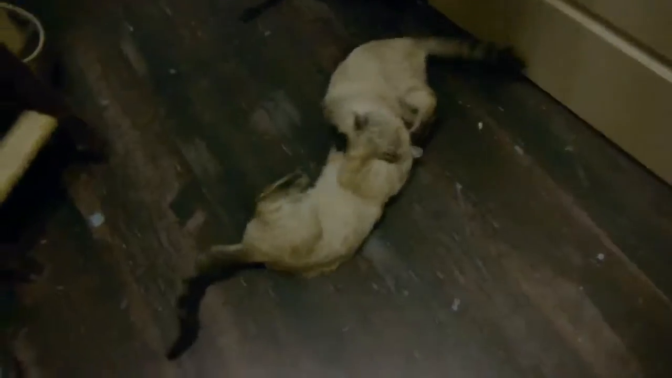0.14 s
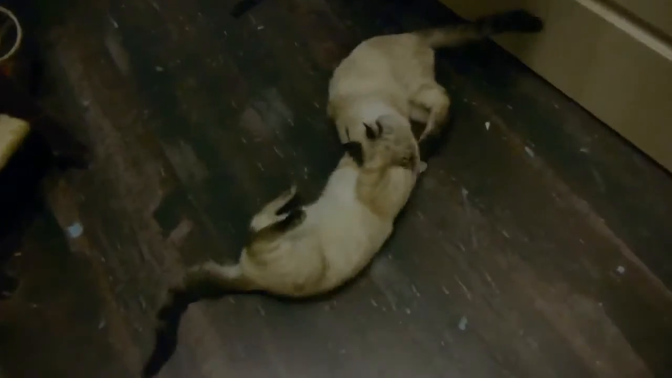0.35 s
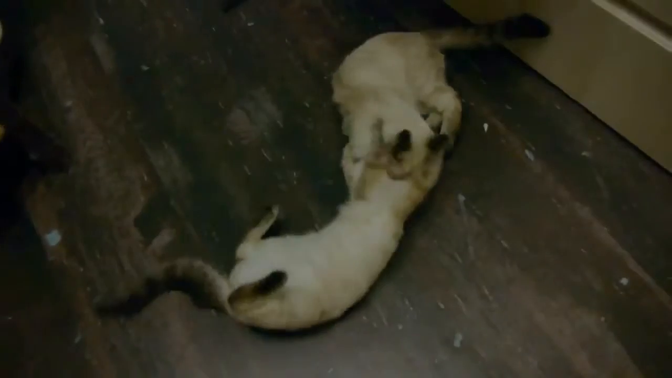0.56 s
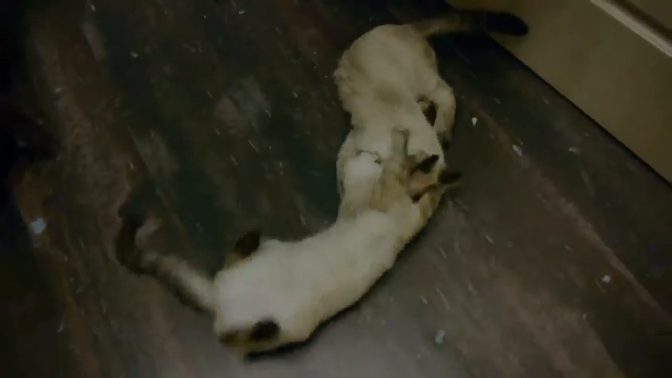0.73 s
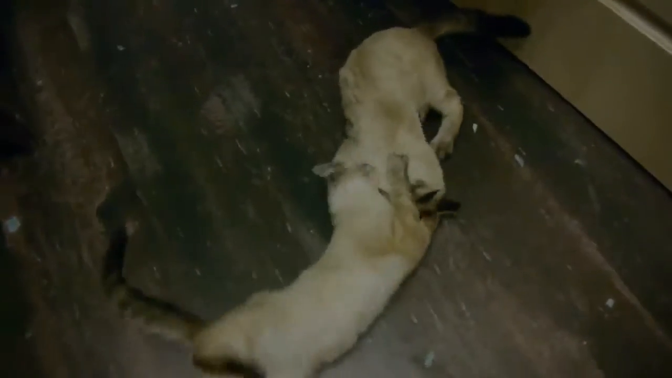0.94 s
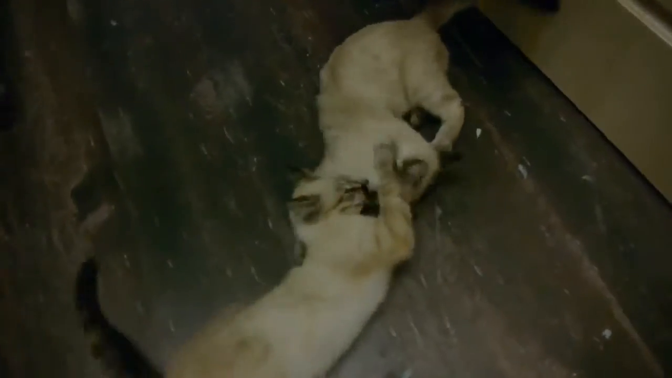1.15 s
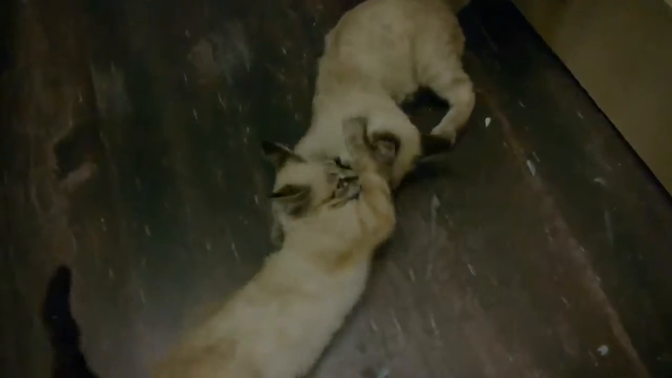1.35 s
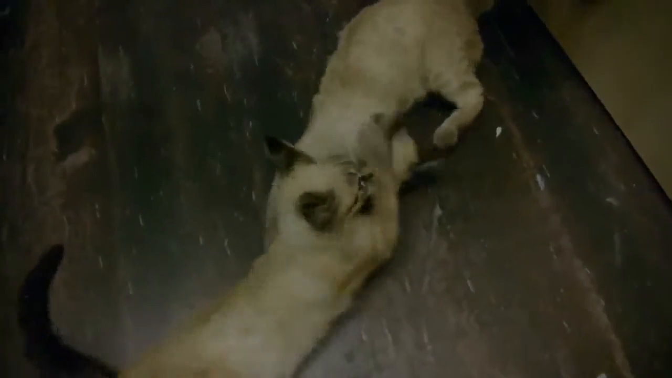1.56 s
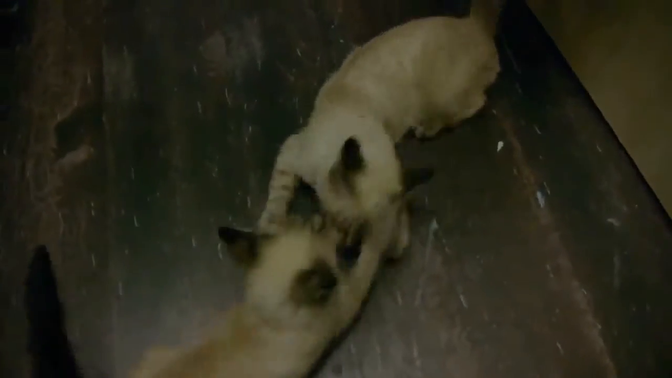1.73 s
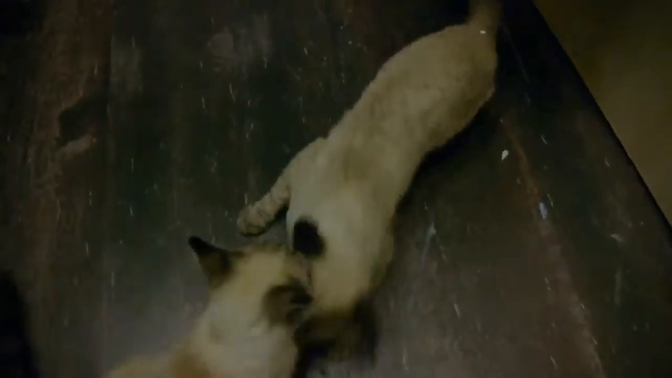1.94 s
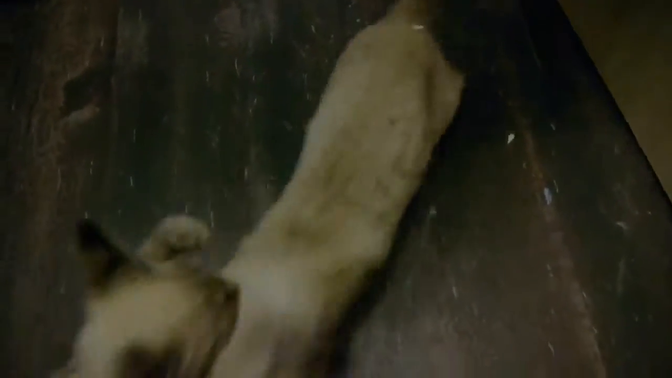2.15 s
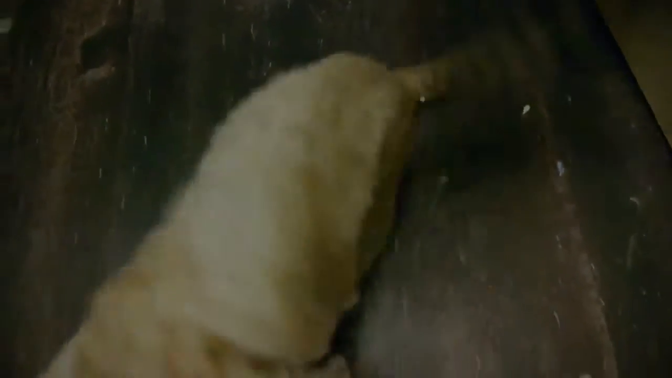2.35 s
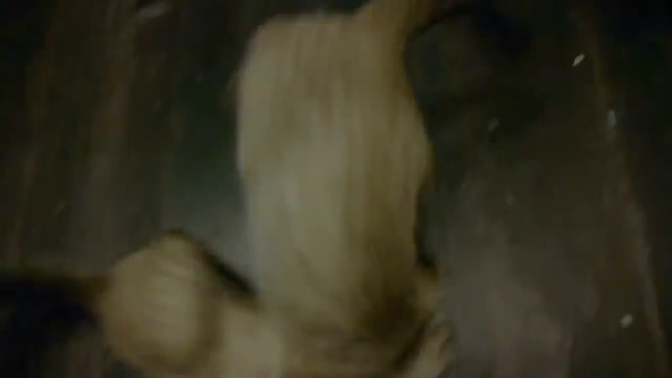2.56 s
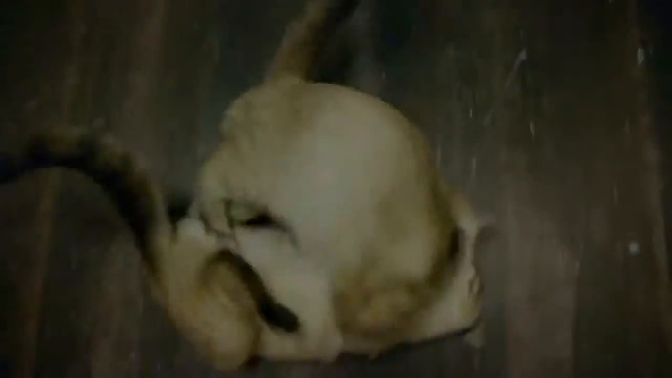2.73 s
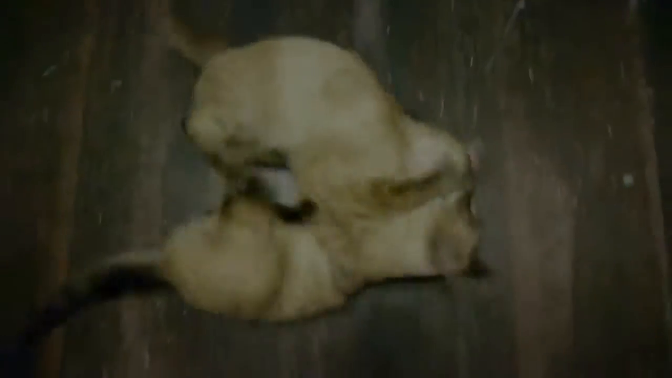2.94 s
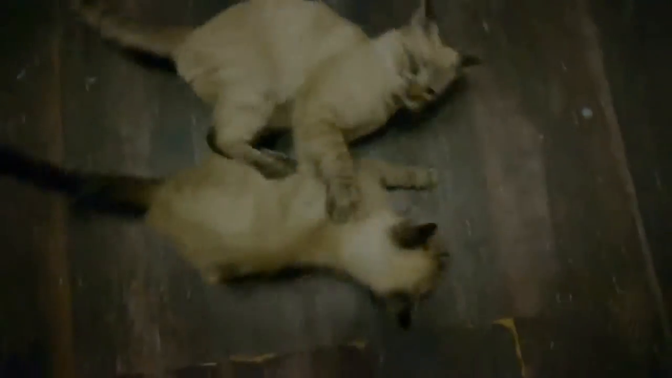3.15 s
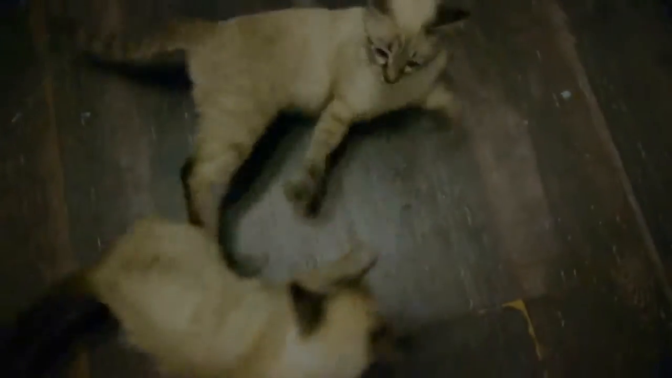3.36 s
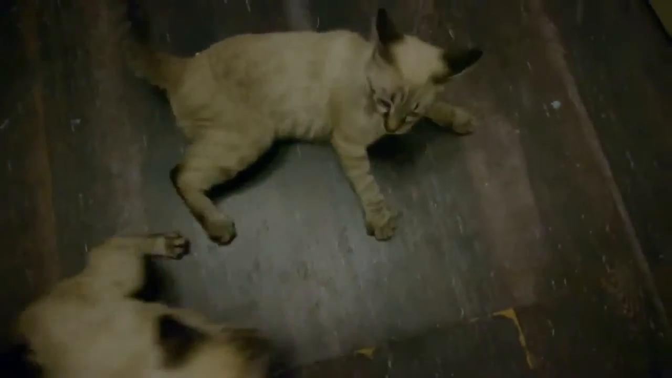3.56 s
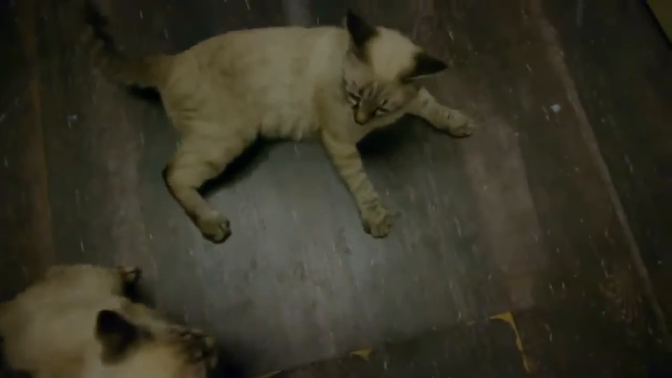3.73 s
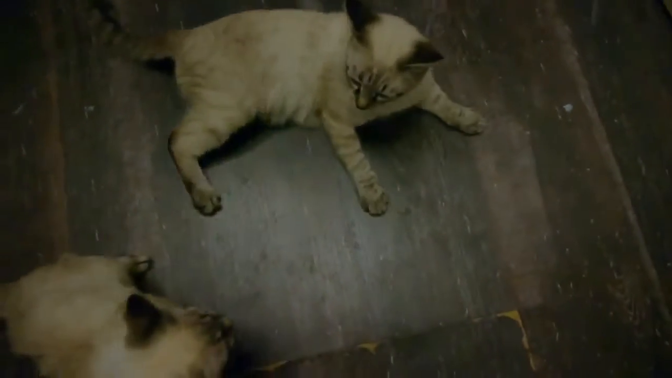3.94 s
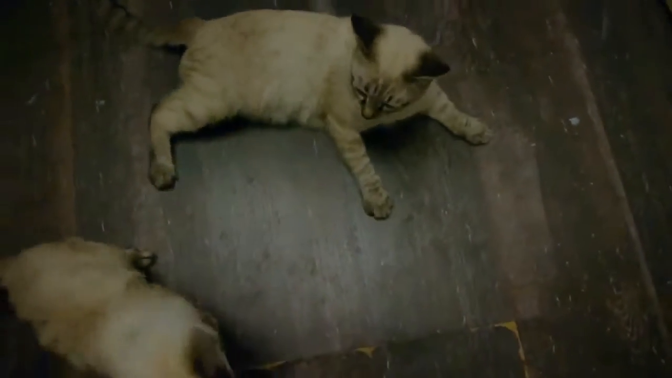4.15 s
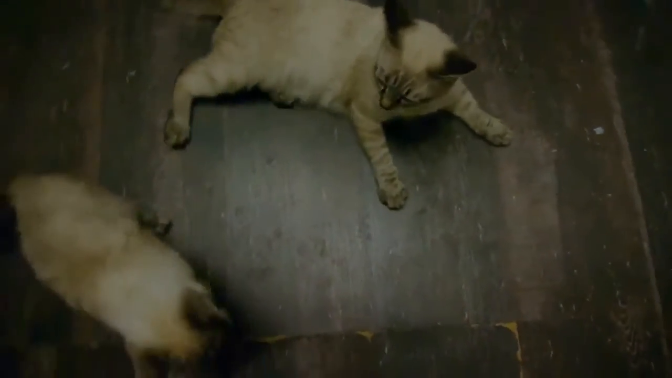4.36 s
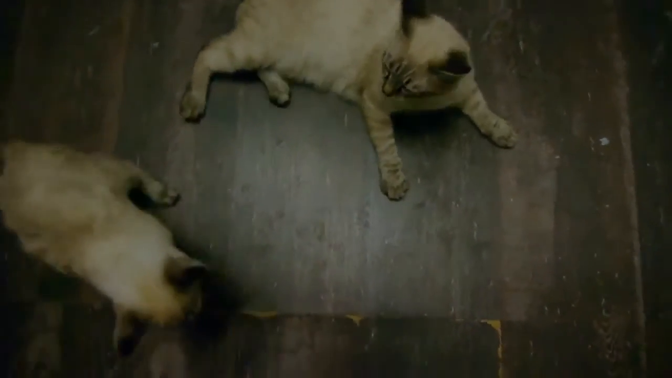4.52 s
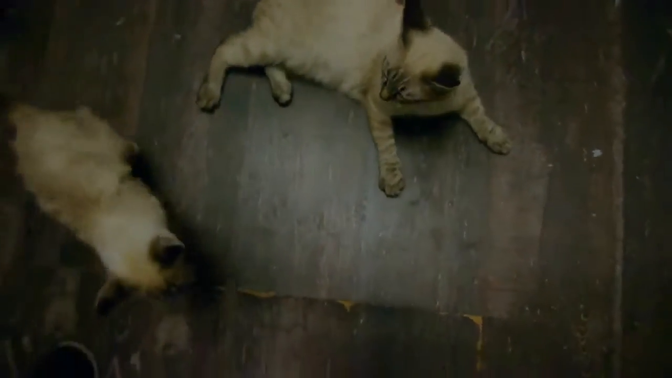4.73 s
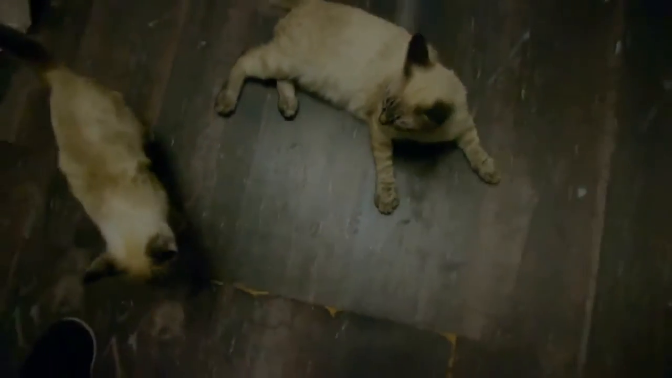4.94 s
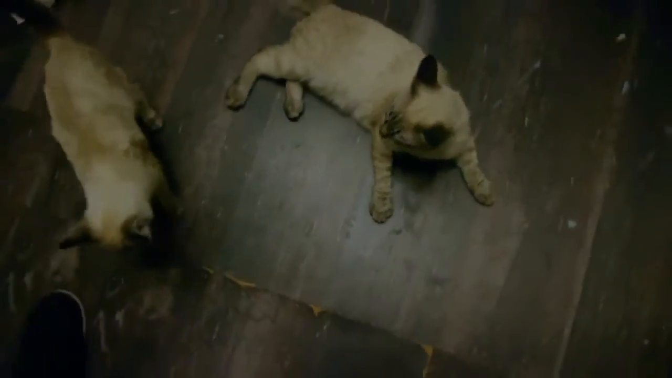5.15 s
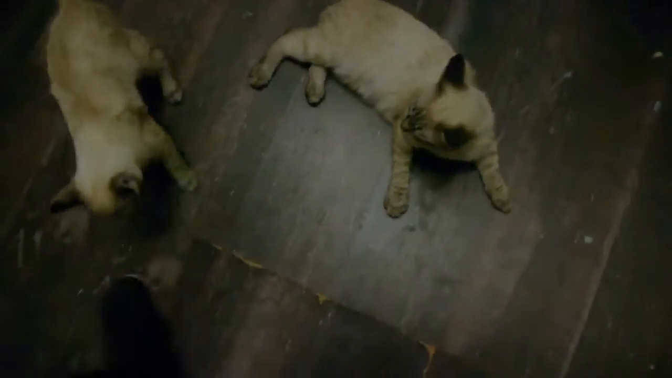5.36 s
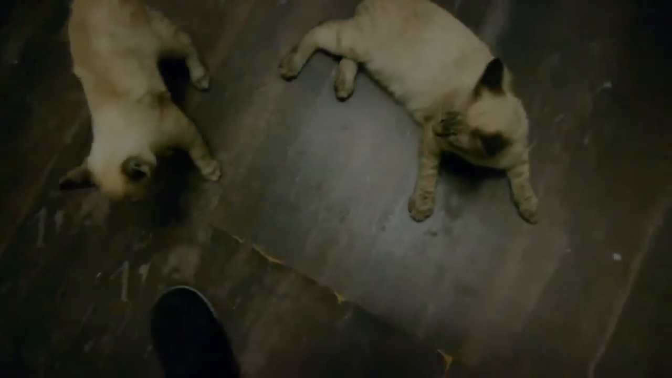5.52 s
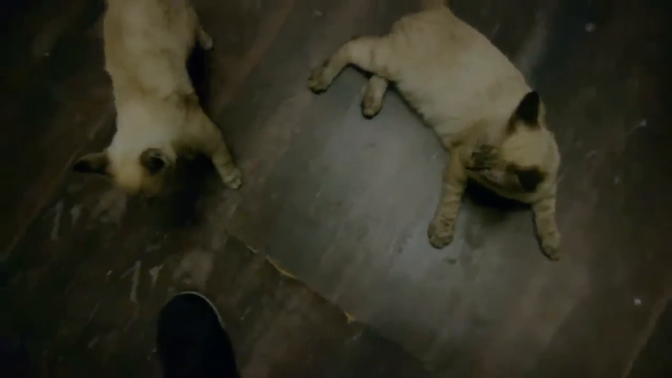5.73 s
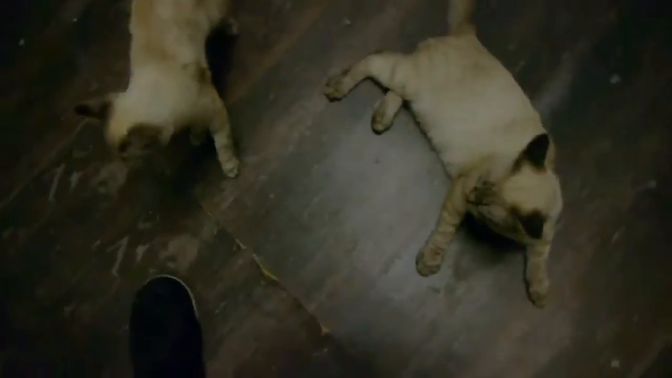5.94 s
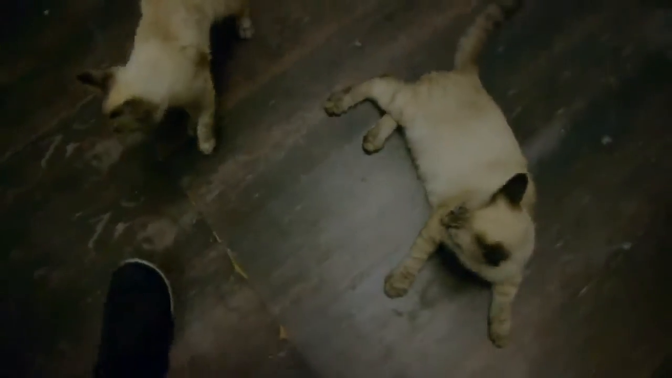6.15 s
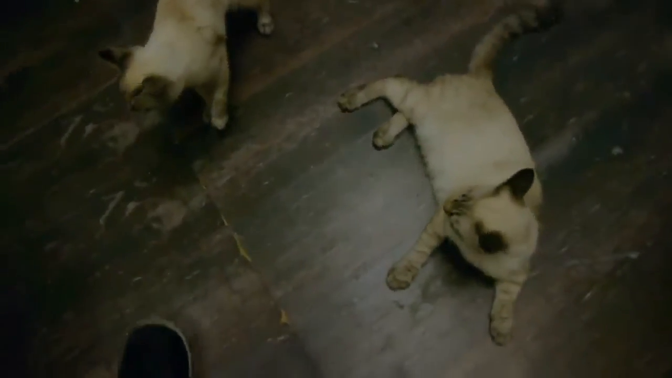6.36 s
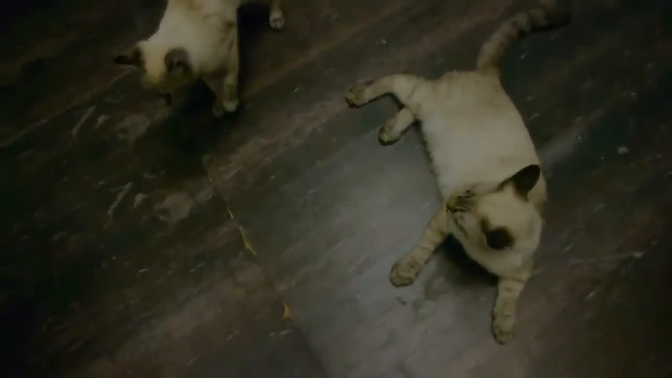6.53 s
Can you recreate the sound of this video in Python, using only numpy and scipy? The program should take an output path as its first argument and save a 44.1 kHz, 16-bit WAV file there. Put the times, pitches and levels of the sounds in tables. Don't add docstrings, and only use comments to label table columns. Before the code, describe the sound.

Two cats scuffle on a wooden floor, close and nearly dry with a short indoor ring. Quiet grainy rustling and pad taps lead to a woody thump, a second firmer one, then a sudden violent knock with rapid follow-up thuds. A last scrabbling lurch and thud end the fight; a low hum enters as sparse claw ticks, a soft slap and small fur swishes continue.

```python
import sys
import numpy as np
from scipy import signal
from scipy.io import wavfile
from scipy.ndimage import uniform_filter1d

SR = 44100
rng = np.random.default_rng(int(sys.argv[2]) if len(sys.argv) > 2 else 0)


def natural_amplitude(level_db):
    exponent = np.asarray(level_db, float) / 20
    return 10 ** exponent


def dump_mix(stems):
    frames = np.atleast_2d(stems).T
    limited = np.clip(frames, -1, 1)
    pcm = np.round(limited * 32767).astype(np.int16)
    wavfile.write(sys.argv[1], SR, pcm)


N = 290619

# (frequency [Hz], density [dB/Hz])
QUIET_SPECTRUM = [(12, -54), (20, -21), (43, -26.5), (91, -10), (146, -12), (301, -8), (377, -13),
                  (607, -15), (1190, -21.5), (2530, -31.5), (2990, -29.5), (10800, -37.5), (14700, -40.5),
                  (16000, -65)]
# (multiple of the fundamental, level [dB])
HUM_PARTIALS = [(1, 1.5), (2, -14), (3, -9.5), (4, -23), (6, -16.5)]
# (frequency [Hz], side over mid [dB])
PORT_SIDE = [(60, -16), (110, -21.5), (200, -28), (380, -20.5), (700, -10.5), (1290, -8), (2380, -0.5),
             (4400, -1.5), (8120, 0.5), (15000, 3)]
# (frequency [Hz], t60 [s])
ROOM_T60 = [(150, 0.18), (250, 0.37), (500, 0.38), (1000, 0.22), (3000, 0.2), (6000, 0.2), (12000, 0.24)]
# (time [s], left over right [dB])
PLACE = [(0.0, 0), (0.79, -0.5), (0.84, -2.5), (3.12, 1.5), (3.28, -3.0), (5.47, 2), (5.97, -1.5),
         (6.59, 2.0)]
# (frequency [Hz], density [dB/Hz])
RUMBLE_SPECTRUM = [(35, -49), (60, -30), (101, -19), (124, -38), (194, 20.5), (231, 9.5), (323, 15.5),
                   (924, 5.5), (1500, -5), (1950, -1), (3300, -120)]
# (peak time [s], level [dB], rise [s], fall [s])
LEANS = [
    (.31, -43.5, .3, 0.24),
    (1.12, -43, 0.45, 0.39),
    (1.95, -54, 0.39, .7),
    (2.92, -40, 0.12, 0.48),
    (3.6, -30.5, 0.054, 0.097),
    (5.69, -46.5, 0.17, 0.18),
    (6.4, -53.5, 0.82, .5),
]
# (frequency [Hz], density [dB/Hz])
FUR_SPECTRUM = [(290, -23), (500, -5.5), (578, -16.5), (640, -13.5), (906, -13), (1380, -9), (2500, -19.5),
                (4730, -15.5), (12000, -23.5), (16000, -32)]
# (peak time [s], hiss [dB], rise [s], fall [s], sheen [dB])
SWEEPS = [(.26, -41, 0.081, 0.1, -5), (.43, -58, 0.16, 0.11, -1), (.65, -63.5, .04, 0.18, 3.5),
          (.78, -49, 0.03, 0.068, -3), (1.04, -33.5, 0.05, 0.18, -5), (1.19, -41, 0.11, 0.19, -1.5),
          (1.36, -45.5, 0.15, 0.048, -1), (1.91, -61.5, .06, 0.12, -3.5), (2.1, -48, 0.11, 0.18, -11),
          (2.27, -54, 0.12, 0.054, -9), (2.47, -59.5, 0.11, 0.037, -1), (2.85, -44.5, 0.11, 0.38, -2),
          (3.03, -45, 0.19, 0.2, -3.5), (3.49, -38.5, 0.16, 0.13, -4.5), (3.93, -60.5, 0.055, .09, -21),
          (4.8, -67.5, 0.36, 0.6, -8), (5.25, -57.5, 0.22, 0.23, -2), (5.42, -59, 0.1, 0.047, -1),
          (5.81, -46.5, .06, 0.055, -4.5), (6.04, -48.5, 0.048, 0.076, -3), (6.2, -56.5, 0.18, 0.13, -6),
          (6.39, -42.5, 0.11, 0.18, -3), (6.54, -39, 0.14, 0.28, -4.5)]
# (time [s], hiss [dB], fall [s], sheen [dB])
SKIDS = [(0.004, -62, 0.025, -5), (.112, -54, 0.086, -2), (.187, -46.5, .08, -7.5), (.98, -47.5, .06, -1),
         (1.715, -53, 0.13, -11), (3.56, -38.5, 0.075, -10), (3.845, -59, 0.044, -8),
         (4.13, -49.5, 0.12, -16), (5.572, -45.5, .14, -3.5), (5.9, -59, 0.07, -26),
         (5.985, -55, 0.078, -5)]
# (time [s], extra low share [dB])
PRESS = [(0, 2.5), (.9, -4), (1.05, 3.5), (1.4, 0.5), (2.3, 0.5), (2.75, 8), (2.9, -2), (3.3, -2.5),
         (3.5, -3.5), (3.62, 9), (3.8, -0.5), (5.8, 0), (6.05, 2), (6.38, 4), (6.59, 2.5)]
# (time [s], level [dB], pitch [Hz])
SQUEAK = [
    (0.989, -70, 3700),
    (1.019, -37, 3836),
    (1.049, -29.5, 3800),
    (1.07, -64, 4300),
    (1.12, -48, 4170),
    (1.152, -68, 4340),
]
# (peak time [s], level [dB], half length [s], resonance [Hz], width [Hz])
SCRAPES = [(1.05, -40, .022, 3075, 900), (1.05, -49, .03, 1590, 500), (1.12, -44, 0.042, 4370, 900),
           (2.478, -58, 0.026, 4090, 900), (1.803, -66, 0.065, 303, 150), (3.449, -50, 0.035, 2304, 600),
           (3.485, -45, 0.024, 3560, 900), (3.478, -52, 0.028, 398, 200), (3.682, -55, .04, 2520, 2000),
           (3.575, -40, 0.032, 3750, 700), (4.788, -61, .04, 2840, 1200), (5.568, -51, 0.017, 530, 150),
           (5.822, -52, 0.04, 5000, 900), (6.016, -58, 0.025, 1405, 800), (6.481, -55, 0.092, 1496, 600)]
# (time [s], peak [dB], pitch [Hz], room [dB])
CLAWS = [(.103, -45, 5070, 11), (.165, -31, 4500, -9), (.804, -39, 5500, -11), (.948, -43, 3000, -6),
         (2.355, -52, 6000, -10), (2.395, -42, 4380, 8), (2.409, -46, 4300, -10), (2.43, -48, 2500, -10),
         (2.477, -44, 11000, -10), (2.579, -52, 7000, 11.5), (3.762, -48, 4700, 6), (3.837, -36, 3013, 4),
         (3.882, -37, 2000, 0), (3.95, -46, 4060, -15), (3.988, -42.5, 4790, -10), (4.44, -54, 1200, -8),
         (4.533, -41.5, 1100, -4), (4.534, -46.5, 4800, -8), (4.57, -54, 3000, -10), (4.735, -50, 7000, -5),
         (4.817, -52, 7500, -8), (4.797, -43, 2230, -2), (4.972, -43.5, 7700, 2), (5.87, -32, 4850, -6),
         (5.892, -34.5, 5150, -12), (5.98, -56, 4800, -5), (5.91, -44, 4800, -15), (6.125, -46, 3000, -10),
         (6.13, -37, 3900, -1), (6.149, -44, 4000, -8), (6.256, -30, 4300, -20), (6.295, -31.5, 4760, 3.5)]
# (time [s], peak [dB], pitch [Hz], width [Hz], room [dB])
SLAPS = [(.067, -39.5, 4700, 1200, -21), (.485, -36, 4770, 1200, -18), (.632, -46, 4900, 1500, 4.5),
         (.763, -32.5, 4600, 1200, -1), (.764, -35, 970, 90, -16), (.979, -32.5, 2970, 4930, 11),
         (1.7005, -37.5, 3340, 800, 7), (2.46, -37, 4400, 1820, 7), (2.461, -32.5, 8800, 5100, -4.5),
         (2.705, -31.5, 2170, 2500, 4), (2.7215, -15.5, 1050, 700, -10), (2.722, -32, 3900, 1990, 5.5),
         (2.9227, -26, 1390, 900, -16), (2.947, -29, 597, 300, -13), (2.056, -29.5, 560, 300, -10),
         (3.185, -31, 1400, 1200, 0.5), (3.5505, -26, 1550, 350, 4), (3.551, -21.5, 760, 200, -6),
         (3.552, -25, 3570, 3020, 7), (4.1165, -28, 3220, 3960, 7), (4.121, -24, 2400, 4640, 3),
         (5.56, -42.5, 2230, 2480, 5)]
# (frequency [Hz], level [dB], t60 [s])
JOISTS = [(37.2, -20, 0.62), (69.5, 5.5, 0.32), (96.2, -1.5, 0.59)]
# (time [s], level [dB], long joists [dB])
SHAKES = [
    (2.054, -50, -9),
    (2.721, -39.5, -4),
    (2.926, -47, -6),
    (3.554, -35.5, -7),
    (3.61, -46, 0),
]
# (frequency [Hz], level [dB], t60 [s])
BOARDS = [(177.3, -2, 0.24), (202, -28, 0.16), (248.5, -3.5, 0.24), (307, -0.5, 0.29), (346, -10, 0.45),
          (378, -6.5, 0.55), (422.7, -4.5, 0.27), (452, -5, 0.41), (544, 0.5, 0.17), (596, 5.5, 0.25),
          (656, -10, 0.18), (744, -10, 0.12), (760, -1.5, 0.22), (870, -4, 0.25), (840, -19, 0.41),
          (990, -24, .25), (1200, -22, 0.23)]
# (frequency [Hz], level [dB], t60 [s])
NORTH = [(206, -3, 0.235), (258, 0, 0.2), (307, -7, 0.23), (358, 1.5, .17), (425, -6, 0.35),
         (532, -10, .35), (610, -18, .4), (740, -10, .12)]
SOUTH = [(179, -14, 0.41), (209, -16.5, 0.55), (254, 0, 0.17), (307, -0.5, 0.23), (415, -10, 0.37),
         (580, -14, .25), (646, -17, .24), (807, -22, .27)]
MIDDLE = [(202, -6.5, 0.25), (258, -5, 0.31), (307, -3, 0.16), (348, 1, 0.18), (375, -3.5, 0.27),
          (440, -5, .3), (458, -4, 0.28), (554, -7, 0.36), (636, -15, 0.6), (705, -15, .4),
          (780, -15, 0.28), (851, -15, .15), (1050, -18, .2)]
EAST = [(209.4, -2, 0.23), (258, -3, 0.13), (306, -8.5, 0.29), (381.2, 0.5, 0.24), (421.3, -14, 0.6),
        (442.4, -10, 0.34), (505, 0, 0.14), (580, -12, .15), (650, -11, 0.25), (730, -15, 0.23),
        (800, -16, .2)]
WEST = [(209, -19, .3), (258, 4, .15), (307, -18, 0.17), (350, 3, .15), (458, -10, 0.7), (560, -10, .15),
        (775, -10, .2), (870, -20, 0.27)]
EDGE = [(118, -9, 0.55), (162.3, -11, .4), (202, -15, .5), (285, 4, 0.21), (350, -3, 0.38),
        (463, -12, 0.34), (565, -4.5, 0.36), (741, -4, 0.18), (1104, -24, .15), (1550, -10, .2)]
PATCHES = [NORTH, SOUTH, MIDDLE, MIDDLE, MIDDLE, EAST, EAST, WEST, EDGE, EDGE]
# (time [s], peak [dB], pitch [Hz], contact [ms])
PAWS = [(0.179, -39.5, 307, 3.1), (.929, -54, 322, 1.8), (.972, -37.5, 393, 2.3), (1.699, -33, 385, 2.1),
        (1.724, -31.5, 307, 1.3), (2.308, -35, 258, 3.5), (2.434, -37, 243, 2.3), (3.165, -37, 254, 3.9),
        (3.185, -29, 580, 1.2), (3.415, -32.5, 460, 1.5), (3.5505, -21.5, 760, 1.44),
        (3.881, -41, 330, 1.3), (4.053, -41.5, 295, 1.7), (4.119, -29.5, 330, 0.84),
        (5.559, -32.5, 314, 1.48), (5.801, -38, 392, 2.2)]
# (time [s], peak [dB], pitch [Hz], contact [ms], floor ring [dB])
FALLS = [
    (1.2614, -16.5, 344, 2.22, -12.5),
    (2.0557, -14, 259, 2.7, -18),
    (2.696, -31.5, 258, 1.6, -4),
    (2.712, -11.5, 240, 1.6, -23),
    (2.721, -0.1, 318, 2.34, -14.5),
    (2.9216, -11.5, 266, 1, -13.5),
    (2.9462, -10, 303, 2.6, -13.5),
    (3.188, -19.5, 290, 1.8, -19.5),
    (3.55, -15.5, 305, 1.3, -11),
    (3.61, -26, 145, 2.2, -11),
]
# (time [s], band edge [Hz])
TREBLE_EDGE = [(2.68, 16500), (2.7, 13500), (2.712, 7500), (2.718, 11900), (2.73, 12000), (2.737, 8300),
               (2.755, 8150), (2.765, 13500), (2.81, 14800), (2.98, 15300), (3.0, 16500)]


def evened(x):
    return x / np.sqrt(np.mean(x ** 2) + 1e-20)


def read(points, hz):
    f, value = np.transpose(points)
    return np.interp(np.log(hz + 1), np.log(f + 1), value)


def add(mix, s, sound):
    part = mix[..., round(s * SR):][..., :sound.shape[-1]]
    part += sound[..., :part.shape[-1]]


def sides(pan_db):
    return natural_amplitude(np.array([[.5], [-.5]]) * pan_db)


def pan_at(s):
    return sides(np.interp(s, *np.transpose(PLACE)))


def noise(field_db, patchy_db, length, size=512):
    hop = size // 4
    hz = np.fft.rfftfreq(size, 1 / SR)[:, None]
    t = np.arange(length // hop + 2) * hop / SR
    a, b, c, d, patches = rng.standard_normal((len(t), len(hz), 5)).T
    patches = uniform_filter1d(patches, size=6, axis=0)
    patches = evened(uniform_filter1d(patches, size=12, axis=1))
    mid = a + 1j * b
    side = (c + 1j * d) * natural_amplitude(read(PORT_SIDE, hz))
    z = np.array([mid + side, mid - side]) * natural_amplitude(field_db(hz, t) + patchy_db * patches)
    return signal.istft(z, nperseg=size, noverlap=size - hop)[1][:, :length]


def resonant_noise(shape, width_hz, turn):
    r = np.exp(-np.pi * width_hz / SR)
    fuzz = signal.lfilter([1], [1, -r], rng.standard_normal((*shape, 2)) @ [1, 1j])
    return evened((fuzz * np.exp(1j * turn)).real)


def strokes(rows, t):
    s, db, rise, fall = np.transpose(rows)[:4, :, None]
    u = abs(t - s) / np.where(t < s, rise, fall)
    return natural_amplitude(2 * (db - 12 * np.minimum(u, 9) ** 1.78))


def ring(modes, shares, build_s=0):
    hz, db, t60 = np.transpose(modes)[:, :, None]
    t = np.arange(SR // 2) / SR
    mode_build_s = build_s * (hz / 300) ** 0.53 + 1e-6
    rise = 1 - np.exp(-(t / mode_build_s) ** 2)
    return (shares[:, None] * natural_amplitude(db - 60 * t / t60) * rise * np.sin(2 * np.pi * hz * t)).sum(0)


def tail():
    x = noise(lambda hz, t: -60 * t / read(ROOM_T60, hz), 0, SR // 2, size=256)
    x *= 1 - np.exp(-np.arange(SR // 2) / (.004 * SR))
    return x / np.linalg.norm(x.mean(0))


def room_tone():
    return natural_amplitude(-55.5) * evened(noise(lambda hz, t: read(QUIET_SPECTRUM, hz) + 0 * t, 0.11, N, size=2048))


def hum():
    hum_hz, hum_db, sag_db_per_s, second_db = 99.8, -59.5, -3, -68.5
    in_step_s, beat_hz, beat_hz_per_s = 5.56, 2.57, 0.33
    t = np.arange(N) / SR
    waver = uniform_filter1d(rng.standard_normal(N), size=4000)
    waver = evened(uniform_filter1d(waver, size=4000))
    turn = 2 * np.pi * np.cumsum(hum_hz + 0.11 * waver) / SR
    lines = sum(natural_amplitude(db) * np.sin(k * turn + k * k) for k, db in HUM_PARTIALS)
    start = np.clip((t - 3.6) / 0.29, 0, 1)
    since = t - in_step_s
    beat = np.exp(2j * np.pi * (beat_hz + .5 * beat_hz_per_s * since) * since)
    level = abs(natural_amplitude(hum_db + sag_db_per_s * since) + natural_amplitude(second_db) * beat)
    return np.sqrt(2) * start * level * lines


def shift():
    rest_db = -59
    rumble = evened(noise(lambda hz, t: read(RUMBLE_SPECTRUM, hz) + 0 * t, 2.95, N, size=1024))
    level = np.sqrt(strokes(LEANS, np.arange(N) / SR).sum(0) + natural_amplitude(2 * rest_db))
    return rumble * level * natural_amplitude(-7.5)


def slide():
    skid_rise_s = 0.0093
    fidget_db, fidget_sheen_db, fidget_end_s, still_db = -65, -4, 1.0, -92
    rows = SWEEPS + [(at, db, skid_rise_s, fall, sheen) for at, db, fall, sheen in SKIDS]
    s = np.arange(0, N / SR + .004, .002)
    power = strokes(rows, s)
    rest = natural_amplitude(2 * np.where(s < fidget_end_s, fidget_db, still_db))
    total = power.sum(0) + rest
    hiss_db = 10 * np.log10(total)
    sheen_db = (np.transpose(rows)[4] @ power + fidget_sheen_db * rest) / total
    weight_db = -12.5 - 0.35 * (hiss_db + 45.5) + np.interp(s, *np.transpose(PRESS))

    def field(hz, t):
        sheen = np.clip(np.log2((hz + 1) / 5000), 0, 1.4) * (np.interp(t, s, sheen_db) + 3.5)
        weight = np.clip(np.log2(2600 / (hz + 1)), 0, 1) * (np.interp(t, s, weight_db) + 3.5)
        return read(FUR_SPECTRUM, hz) + sheen + weight + 0 * t

    t = np.arange(N) / SR
    hiss = noise(field, 0.99, N)
    band = signal.butter(2, (2000, 7000), "band", fs=SR, output="sos")
    hiss /= np.sqrt(np.mean(signal.sosfilt(band, hiss.mean(0)) ** 2))
    slips = uniform_filter1d(rng.exponential(1, N) - 1, size=60)
    grain = evened(natural_amplitude(0.75 * evened(slips)))
    return hiss * grain * natural_amplitude(np.interp(t, s, hiss_db) - 1.0) * pan_at(t)


def squeak():
    s, db, hz = np.transpose(SQUEAK)
    t = np.arange(s[0], s[-1], 1 / SR)
    turn = 2 * np.pi * np.cumsum(np.interp(t, s, hz)) / SR
    return s[0], natural_amplitude(np.interp(t, s, db)) * resonant_noise((len(t),), 450, turn)


def scrape(s, db, half_s, hz, width_hz):
    t = np.arange(-2 * half_s, 2 * half_s, 1 / SR)
    swell = natural_amplitude(db - 12 * (t / half_s) ** 2)
    return s - 2 * half_s, swell * resonant_noise((2, len(t)), width_hz, 2 * np.pi * hz * t)


def tick(peak_db, hz, width_hz, room_db, length_ms, room):
    t = np.arange(1200) / SR
    crackle = rng.standard_normal(1200) * np.exp(-t * 1000 / length_ms)
    crackle[0] = 3.2
    r = np.exp(-np.pi * width_hz / SR)
    dull = np.exp(-2 * np.pi * (hz + 0.15 * width_hz) / SR)
    poles = np.convolve([1, -2 * r * np.cos(2 * np.pi * hz / SR), r * r], [1, -dull])
    crackle, click = signal.lfilter([1, 0, -1], poles, [crackle, t == 0])
    click *= np.linalg.norm(crackle) / np.linalg.norm(click)
    sound = natural_amplitude(room_db) * signal.fftconvolve(click[None], room, axes=1)
    add(sound, 0, crackle)
    return natural_amplitude(peak_db) * sound / abs(crackle).max()


def shake(db, long_db):
    onset = 1 - np.exp(-np.arange(SR // 2) / (0.0052 * SR))
    return natural_amplitude(db) * ring(JOISTS, natural_amplitude([long_db, long_db, 0])) * onset


def low_bump():
    return 2.722, natural_amplitude(-30) * np.hanning(round(8 * SR / 1000))


def thump(peak_db, hz, contact_ms, ring_db, knock_db, modes, wet_db, room):
    bass_hz, echo_s, echo_db = 201, .018, -12
    t = np.arange(SR // 2) / SR
    force = np.sin(np.pi * np.clip(t[:400] * 1000 / contact_ms, 0, 1)) ** 2.73
    bass_cut = signal.butter(2, bass_hz, "high", fs=SR, output="sos")
    force = signal.sosfilt(bass_cut, np.pad(force, (0, 600)))
    spot = np.cos(2 * np.pi * hz * t[:1000]) * np.exp(-t[:1000] * hz / 0.96)
    blow = signal.fftconvolve(force, spot)
    scale = abs(blow).max()
    knock = np.gradient(force)
    knock *= scale * natural_amplitude(knock_db) / abs(knock).max()
    add(blow, 0, knock)
    sound = np.zeros(SR // 2)
    add(sound, 0, blow)
    add(sound, echo_s, natural_amplitude(echo_db) * blow)
    near = 1 / np.sqrt(1 + (np.log2(np.transpose(modes)[0] / hz) / 1.4) ** 2)
    signs = (-1.) ** np.arange(len(modes))
    boards = ring(modes, near * signs, build_s=0.013) * natural_amplitude(ring_db)
    sound += signal.fftconvolve(force, boards)[:SR // 2]
    add(blow, 0, 1.8 * knock)
    wet = signal.fftconvolve(blow[None], room, axes=1)[:, :SR // 2]
    return natural_amplitude(peak_db) * (sound + natural_amplitude(wet_db) * wet) / scale


def falls_and_paws():
    blows = []
    for (s, db, hz, contact_ms, ring_db), modes in zip(FALLS, PATCHES):
        knock_db = 25 * np.log2(hz / 305)
        blows.append((s, db, hz, contact_ms, ring_db, knock_db, modes, -15))
    for s, db, hz, contact_ms in PAWS:
        knock_db = 1.5 - 10 * (contact_ms - 1)
        blows.append((s, db, hz, contact_ms, -16, knock_db, BOARDS, -4.5))
    return sorted(blows, key=lambda blow: blow[0])


def scene():
    mix = room_tone() + hum() + shift() + slide()
    add(mix, *squeak())
    for row in SCRAPES:
        add(mix, *scrape(*row))
    rooms = [tail() for _ in range(4)]
    ticks = [(s, db, hz, 1900, room_db, 1.0) for s, db, hz, room_db in CLAWS]
    ticks += [(*row, 3.25) for row in SLAPS]
    for k, (s, *row) in enumerate(ticks):
        add(mix, s, tick(*row, rooms[k % len(rooms)]) * pan_at(s))
    for s, *row in SHAKES:
        add(mix, s, shake(*row) * sides(1.1))
    add(mix, *low_bump())
    for k, (s, *row) in enumerate(falls_and_paws()):
        add(mix, s, thump(*row, rooms[k % len(rooms)]))
    return mix


def low_pass(x):
    return signal.sosfilt(signal.butter(12, 16350, fs=SR, output="sos"), x)


def record(dry):
    edge_filter = signal.firwin(255, 16200, fs=SR)[None]
    band = signal.oaconvolve(np.clip(dry, -1, 1), edge_filter, "same")
    hz, t, z = signal.stft(band, SR, nperseg=256, noverlap=192)
    s, edge_hz = np.transpose(TREBLE_EDGE)
    z = z * (hz[:, None] < np.interp(t, s, edge_hz, SR, SR))
    band = signal.istft(z, SR, nperseg=256, noverlap=192)[1][:, :N]
    return low_pass(band)


dry = scene()
out = record(dry)
dump_mix(out)
```